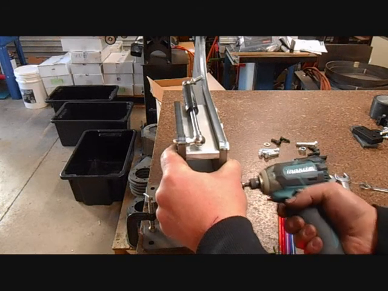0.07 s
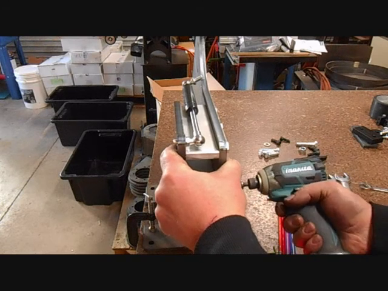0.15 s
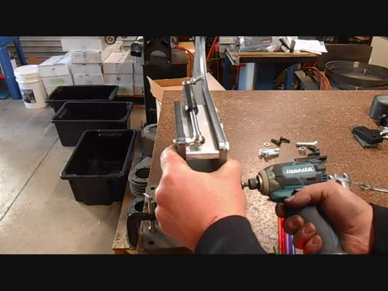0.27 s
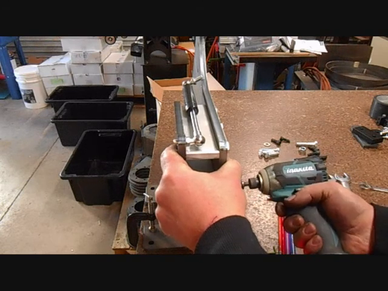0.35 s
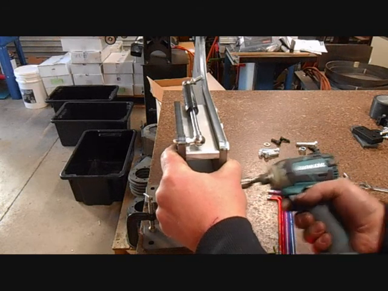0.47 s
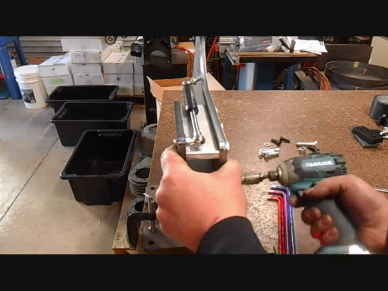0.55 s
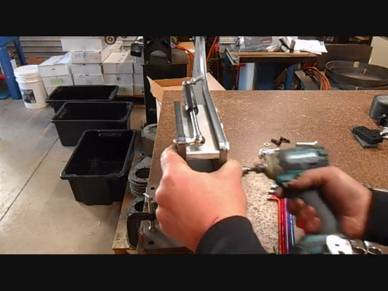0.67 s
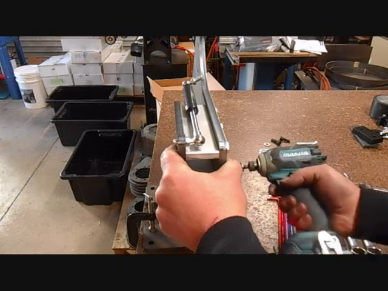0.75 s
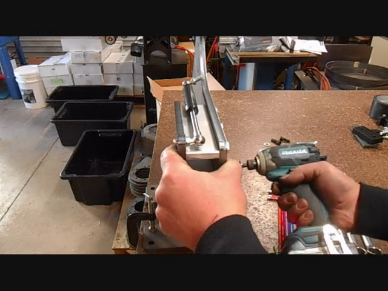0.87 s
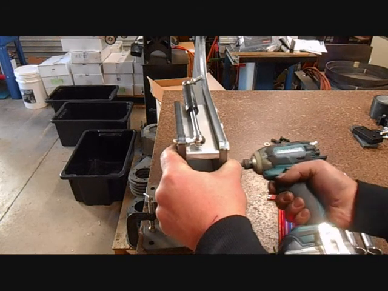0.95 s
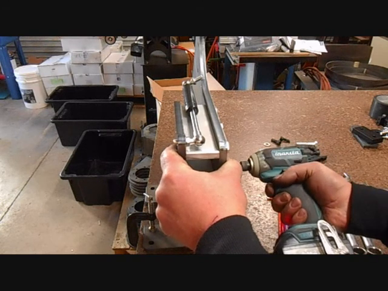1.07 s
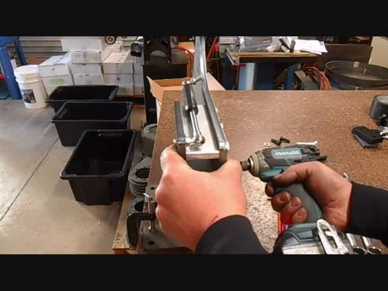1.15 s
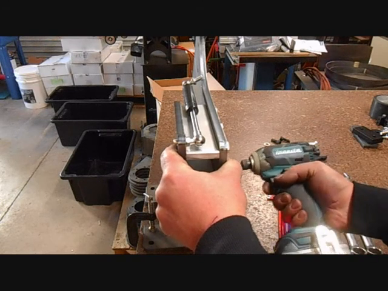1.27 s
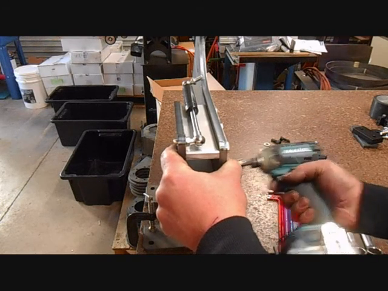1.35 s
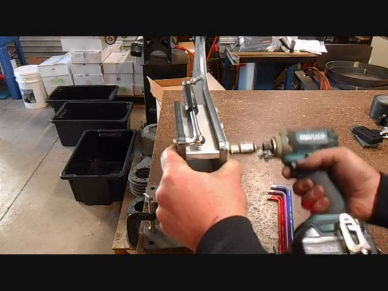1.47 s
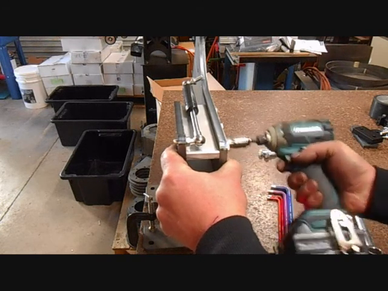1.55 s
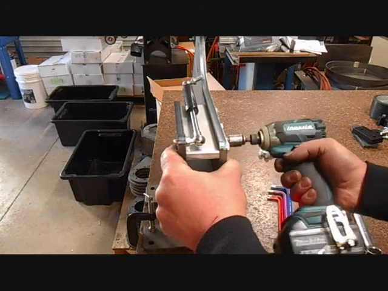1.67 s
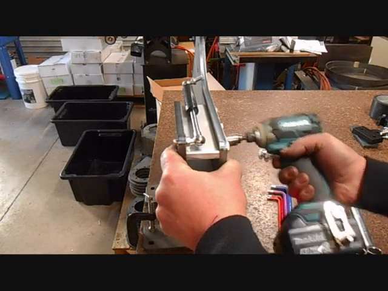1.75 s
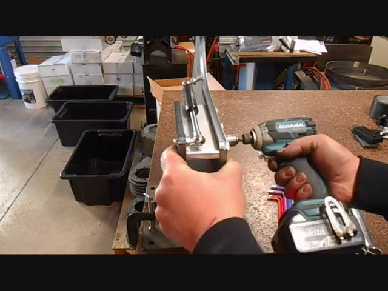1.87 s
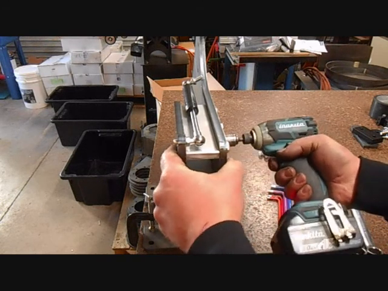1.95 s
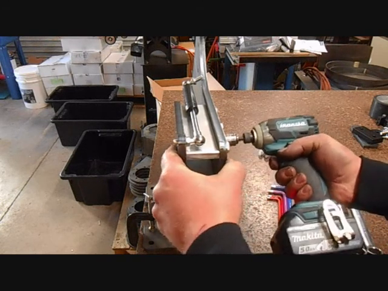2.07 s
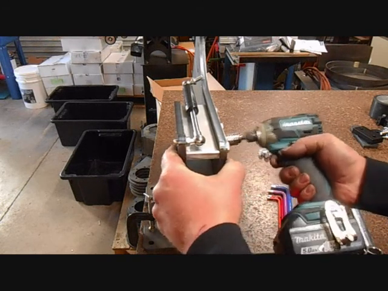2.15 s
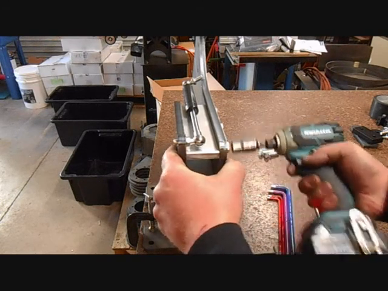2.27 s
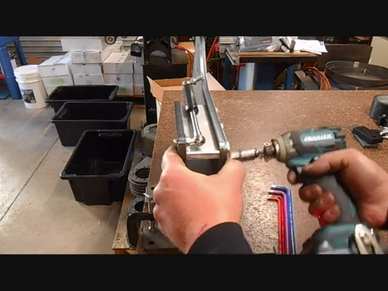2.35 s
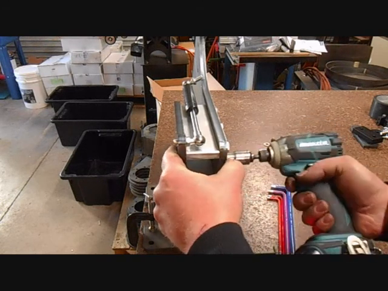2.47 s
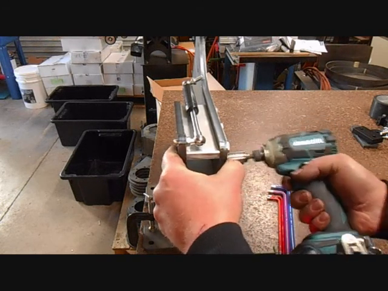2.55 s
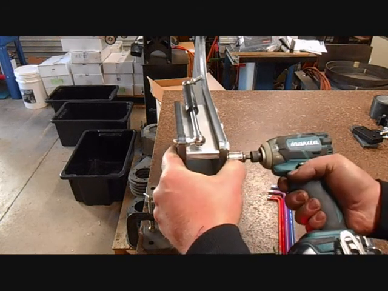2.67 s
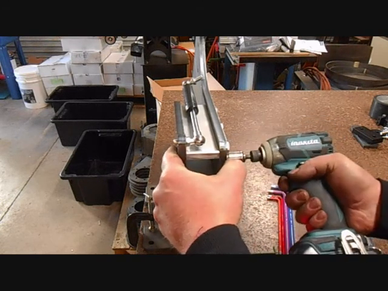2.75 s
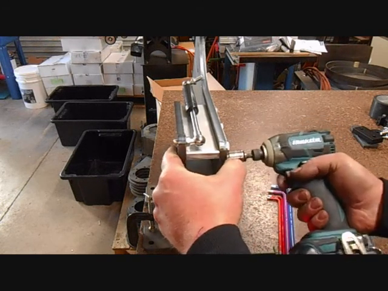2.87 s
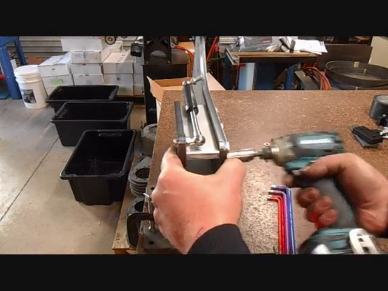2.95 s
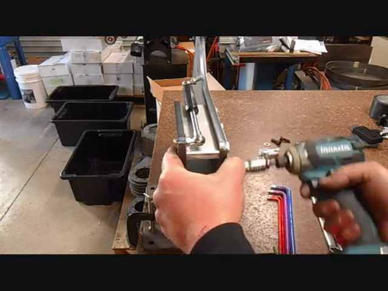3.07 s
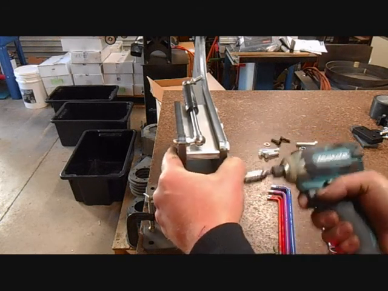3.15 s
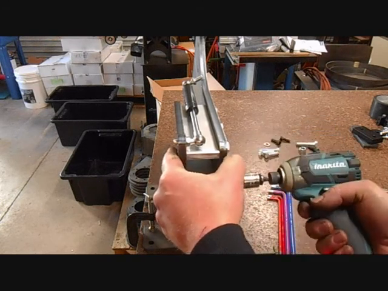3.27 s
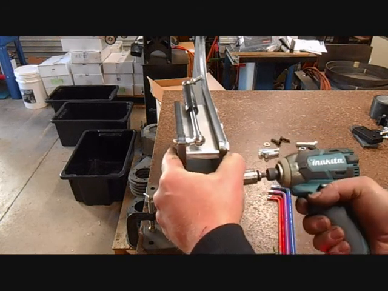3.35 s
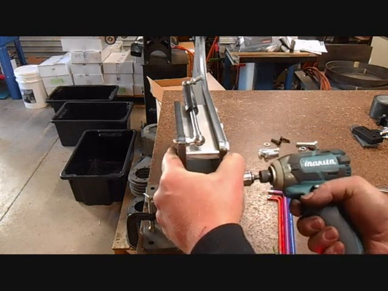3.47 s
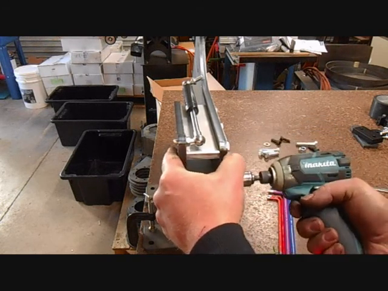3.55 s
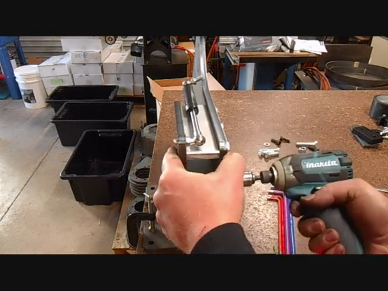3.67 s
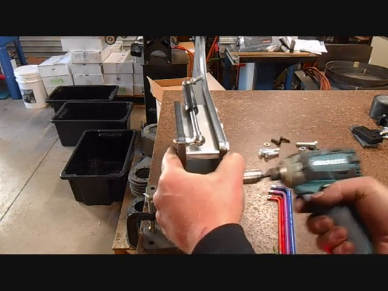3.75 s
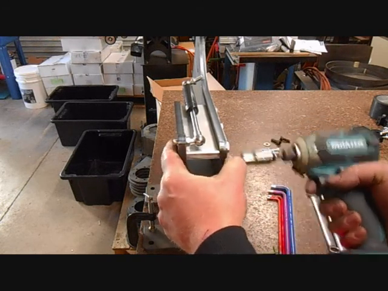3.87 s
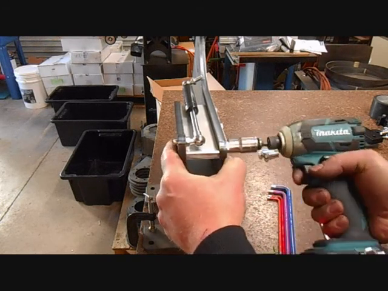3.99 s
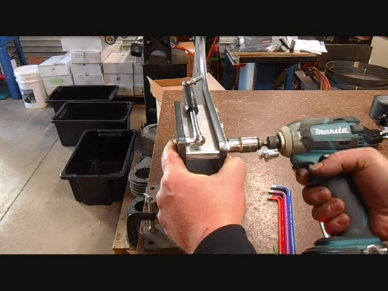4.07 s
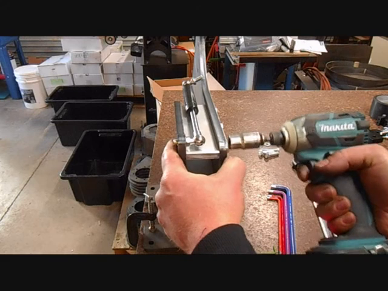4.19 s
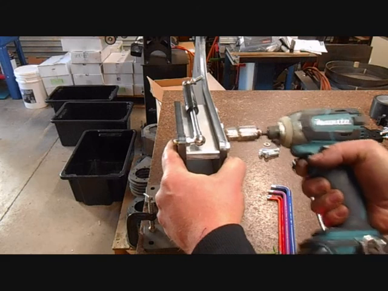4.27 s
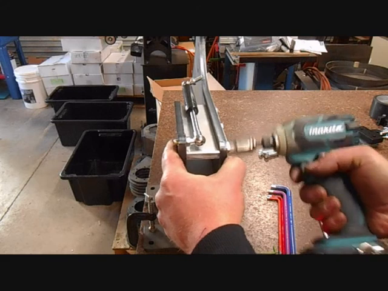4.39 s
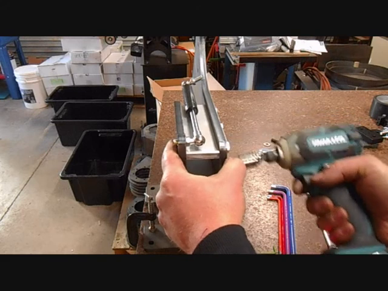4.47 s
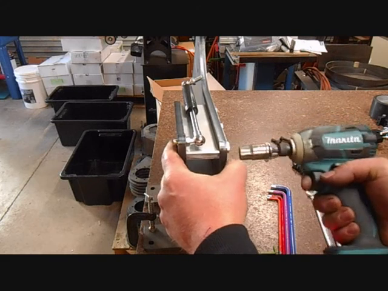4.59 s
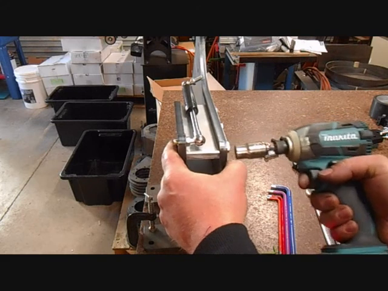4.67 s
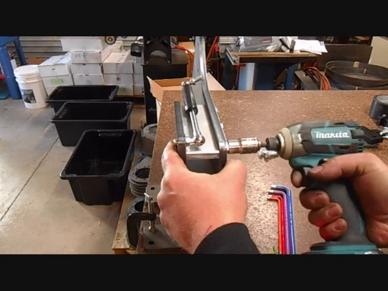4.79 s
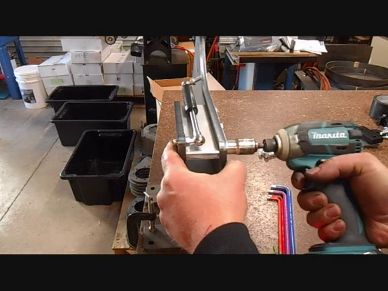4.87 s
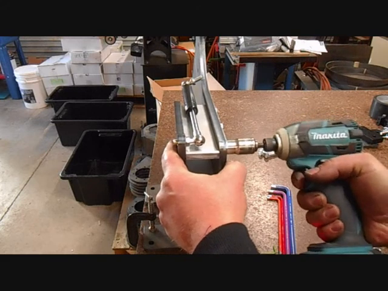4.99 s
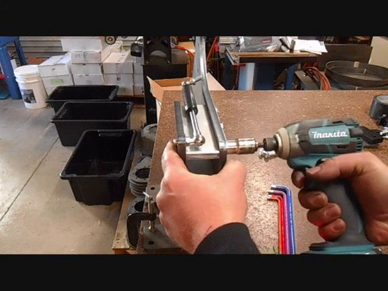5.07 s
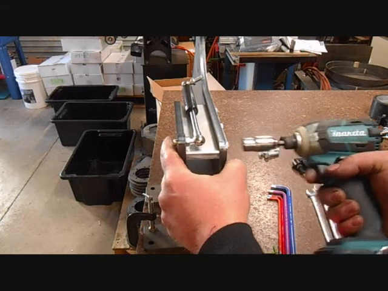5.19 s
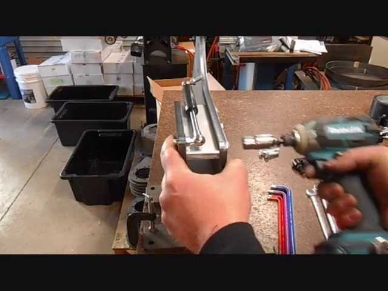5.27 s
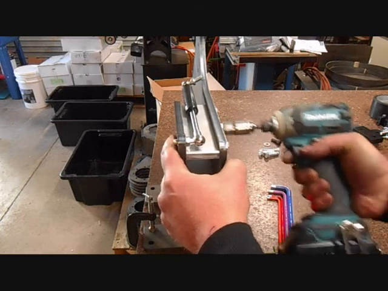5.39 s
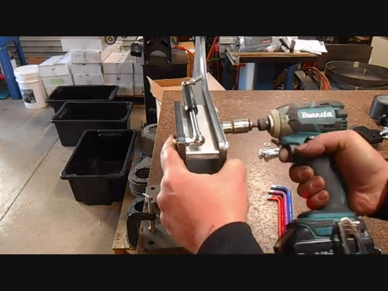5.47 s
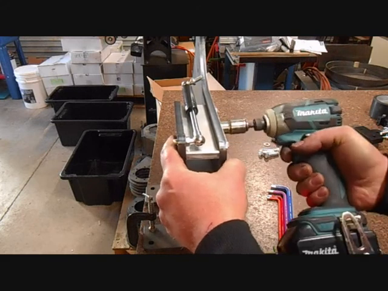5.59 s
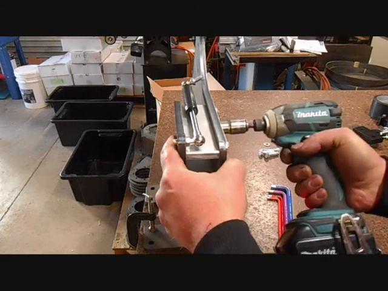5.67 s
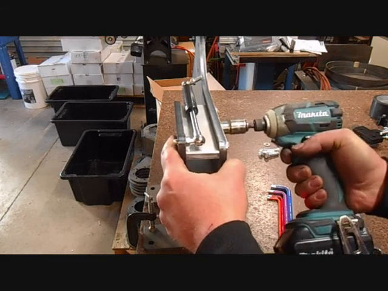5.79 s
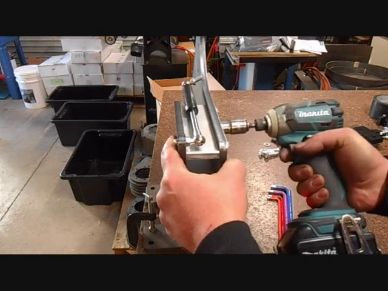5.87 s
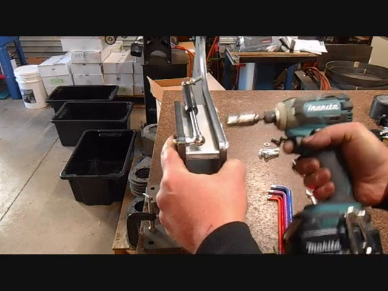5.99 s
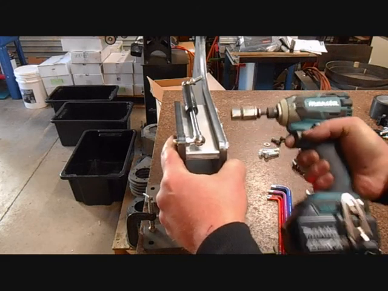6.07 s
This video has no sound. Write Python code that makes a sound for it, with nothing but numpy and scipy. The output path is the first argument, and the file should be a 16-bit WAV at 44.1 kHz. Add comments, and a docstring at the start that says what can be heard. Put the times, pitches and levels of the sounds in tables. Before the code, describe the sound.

Very close, a cordless impact driver works on a steel rail on a workshop bench. Eight times in six seconds the socket clinks onto a bolt, the motor whines up with rasping gears, and on all but the first-rate fast run of the seventh-tenth second or so it breaks into hard, fast metallic hammering, then stops abruptly. One shorter pull only spins. Faint hiss and low rumble fill the gaps, with a short room echo.

```python
"""A cordless impact driver, close to the microphone, pulls eight times at bolts in a rail on a workshop bench.
The motor whistles and spins up, toothed gears rasp, and on seven pulls the hammer strikes some thirty
times a second: bursts of noisy contacts that ring the steel. Ahead of each run the socket clinks onto
the bolt head; it knocks, ticks and squeals, at rest or turning. Rail and bench boom, the room answers
briefly, and the hiss, hum and low rumble of the shop lie behind."""
import sys
import numpy as np
from scipy import signal
from scipy.fft import rfft, irfft
from scipy.io import wavfile
from scipy.ndimage import uniform_filter1d

SR = 44100
rng = np.random.default_rng(int(sys.argv[2]) if len(sys.argv) > 2 else 0)


def generate_wav(signal):
    """Clip the signal to [-1, 1] and save it as 16-bit WAV at the path in sys.argv[1]."""
    frames = np.transpose(np.atleast_2d(signal))
    scaled = np.clip(frames, -1, 1) * 32767
    pcm = np.round(scaled).astype(np.int16)
    wavfile.write(sys.argv[1], SR, pcm)


N = 270333
TIME = np.arange(N) / SR

# Levels in the tables are relative: the gains of each source and of the microphone channel follow.
# trigger pulls: (start [s], soft start [s], release [s], free rotor speed [turns/s],
#                 gear noise while the thread bites [dB], gear noise once it runs freely [dB])
TRIGGER_PULLS = [ (.06, .038, 0.52, 383, -10, -17.5), (.895, .02, 1.385, 343, -14.5, -19.5),
                 (1.74, .018, 2.25, 366, -17, -18), (2.53, .012, 2.97, 395, -22, -25.5),
                 (3.315, 0.029, 3.828, 385, -19.5, -23), (4.15, .022, 4.525, 420, -23, -23.5),
                 (4.9, .02, 5.22, 240, -10.5, -12), (5.615, .088, 5.98, 276, -19, -19), ]
# ringing of rail, bolt and socket: (frequency [Hz], level [dB], t60 [s])
STEEL_RINGING = [(1636, -24, .1), (2023, -23, .12), (2326, -23, .13), (2497, -23, .13), (3554, -21, .04),
                 (4192, -18, .05), (5145, -20, .04), (6713, -21, .05), (6916, -21, .05), (8193, -18, .04),
                 (8446, -19, .04), (9502, -23, .08)]
# resonances of gear case and housing: (frequency [Hz], width [Hz], level [dB])
HOUSING_RESONANCES = [(268, 87, -7), (980, 180, -33), (1950, 45, 9.5), (3330, 660, -1), (4350, 240, -2.5),
                      (4820, 174, -7), (6750, 120, 0), (8300, 34, 11.5)]
# whine of motor and gears: (multiple of the rotor speed), and in the same order (level [dB])
WHINE_ORDERS = [1, 3, 6, 9, 12, 15, 21]
WHINE_LEVELS = [-30, -19, -16, -15, -20, -14.5, -21.5]
# spectrum of the hammer blows: (frequency [Hz], density [dB])
BLOW_SPECTRUM = [(24, -62), (40, -28), (104, -20.5), (174, -18), (277, -12), (358, -17.5), (411, -8),
                 (790, -11.5), (1260, -5), (2650, -2.5), (4540, 1.5), (6000, -2.5), (8320, -1.5),
                 (10500, -3.5), (13600, -75), (22000, -120)]
# spectrum of the socket on the bolt head: (frequency [Hz], density [dB])
CLINK_SPECTRUM = [(59, -77), (100, -24.5), (457, -12.5), (1440, -13), (2250, -4), (2580, -3.5), (4820, 2.5),
                  (5310, 2), (6580, -1), (8640, -2), (10500, -2.5), (13600, -64.5), (22000, -120)]
# spectrum of the gear rasp: (frequency [Hz], density [dB])
GEAR_SPECTRUM = [(35, -56), (60, -14), (155, -21.5), (284, -13.5), (785, -10.5), (1020, -12), (1470, -11.5),
                 (1990, -11.5), (2520, -9), (3000, -3), (3720, -5.5), (4240, 0.5), (8460, -10.5),
                 (10500, -13), (13600, -68), (22000, -120)]
# spectrum of the shop hiss: (frequency [Hz], density [dB])
SHOP_SPECTRUM = [(20, -5), (60, -14), (130, -19), (300, -21), (600, -23), (1450, -27.5), (2500, -20),
                 (4300, -17.5), (7000, -26.5), (10500, -34)]
# reverberation of the shop: (frequency [Hz], t60 [s])
ROOM_DECAY = [(150, 0.24), (1000, 0.25), (4000, 0.21), (10000, 0.17)]
# the socket rubs on the bolt and sings, at rest or turning:
# (start [s], end [s], frequency [Hz], level [dB])
SOCKET_SQUEALS = [(.008, .06, 4200, -29), (0.98, 1.135, 4840, -24), (0.997, 1.221, 1986, -29),
                  (1.879, 2.071, 2052, -30), (2.486, 2.546, 4196, -27), (2.557, 2.815, 4230, -24),
                  (4.256, 4.474, 2330, -34), (4.83, 5.05, 2320, -29), (4.83, 5.05, 1636, -34),
                  (4.837, 5.05, 2472, -23)]
# low boom of rail and bench: (frequency [Hz], width [Hz], level [dB])
BENCH_RESONANCES = [(95.94, 42, 3), (270, 30, -1), (347, 42, -1), (423, 16, -3), (648, 20, -4.5),
                    (1487, 29, -9)]
# how firmly the work presses on the bench: (time [s], level of the boom [dB])
BENCH_PRESSURE = [(0, -10), (1.3, -2), (2.1, -9), (2.85, -3.5), (3.7, 0), (4.4, 7.5), (5.05, 9.5),
                  (5.85, 1.5)]
# hum of the shop: (frequency [Hz], level [dB])
SHOP_HUM = [(215, -62.5), (324, -72), (512, -67.5)]
# hammering as a bolt seats: (first full blow [s], time between blows [s], first blow [dB], loss per blow [dB],
#                             graze ahead of it [s], graze [dB], gear clatter [dB])
HAMMER_RUNS = [ (.394, 0.033, 1, 1.77, 0.016, 3, -5.5), (1.239, 0.035, 3.5, 1.8, .007, -8, -11),
               (2.1037, 0.034, 5.5, 2.5, .018, -4, -6.5), (2.849, 0.037, 2.5, 1.9, 0.0085, -3.5, -12),
               (3.674, .0333, 4, 1.8, .0094, 0, -10), (5.0218, 0.033, 11.5, 3, .015, 4.5, -9),
               (5.8035, 0.033, 4, 2, 0.015, -5.5, -10.5), ]
# the socket is set on a bolt, a tick and then a duller knock as it drops home:
# (time [s], tick [dB], ring [Hz], ring [dB re the contact], drop after [s], drop [dB])
SOCKET_LANDINGS = [ (.009, -32.5, 4220, 5.5, .0212, -17), (0.7973, -6, 6000, -4, .002, -9),
                   (1.6642, -14, 5350, 4, 0.017, -14.5), (2.4753, -14.5, 4060, -1, 0.011, -25),
                   (3.2495, -10.5, 5300, -0.5, 0.015, -18.5), (4.06, -20, 5230, 6.5, .007, -15),
                   (4.822, -1, 4358, -1.5, 0.0019, -6.5), (5.5074, -9.5, 5020, 6, .0085, -14.5), ]
# the socket knocks and jolts on the bolt head, before and during the runs:
# (time [s], level [dB], rattle decay [s], ring [Hz], ring [dB re the contact])
SOCKET_JOLTS = [ (0.167, 3, 0.0065, 5770, -1), (0.2275, -2, .0017, 8130, -1),
                (0.3159, -8, 0.0049, 7670, -9), (.8999, -14, 0.0016, 4470, 8),
                (0.932, -8.5, .004, 3470, -20), (0.957, -3.5, 0.014, 5650, 0),
                (1.0445, -0.5, .0046, 5210, 4.5), (1.737, -26.5, .004, 3600, 4),
                (1.768, -7.5, 0.0011, 4437, 1), (1.7781, -12, 0.0027, 5280, 2),
                (1.8457, 1, 0.0057, 5230, -0.5), (2.542, -19.5, .0017, 4160, 1.5),
                (2.5898, -5.5, 0.0046, 4060, -20), (2.641, -9, 0.0027, 4305, 6.5),
                (3.364, -7, .002, 3330, -1.5), (3.482, -11.5, 0.014, 4300, -5),
                (3.5094, -6.5, .014, 5432, 2.5), (4.1814, -24, 0.0019, 3910, 7.5),
                (4.2198, -12, .004, 9606, -6.5), (4.381, 2.5, 0.006, 5002, -1), (4.334, -14, .002, 9100, 1),
                (4.5307, -19, .001, 8765, 10), (4.857, -9.5, .008, 2440, -2.5),
                (4.878, -12, 0.0094, 2320, 4), (4.934, -12, .003, 5060, -5), (4.9442, 5, 0.016, 5230, -3.5),
                (5.597, -17.5, 0.0039, 7960, -8), (5.632, -4.5, .006, 4500, -0.5),
                (5.72, -10, 0.0039, 4209, 1), ]
# the hands shift their grip and jog the bench: (time [s], length [s], level [dB])
GRIP_SHIFTS = [(1.6, 0.065, -49), (2.659, 0.047, -59), (4.1, .08, -50), (4.304, .08, -55),
               (4.8, 0.069, -45)]
# short extra contacts of hammer and anvil before, between and after the blows: (time [s], level [dB])
EXTRA_CONTACTS = [(.387, -1), (2.249, -8), (3.6568, -9.5), (3.823, -7), (3.839, -19), (5.031, 9.5),
                  (5.181, -8), (5.224, -13), (5.822, -5)]

SHOP_DB, SWITCHING_HZ, CUTOFF_HZ = -49.5, 7890, 10650
# spin-up, coasting and the speed to which hammering drags the rotor
CREEP_TURNS_PER_S, SPIN_UP_S, COAST_S, LOADED_TURNS_PER_S = 20, .043, .028, 195
# gear noise goes from biting to running freely between these times after spin-up begins
BITE_S, FREE_S = 0.11, 0.18
# load builds up around the first blow; the gears' clatter then dies down to a steady level
LOAD_RISE_S, CLATTER_PEAK_S, CLATTER_FADE_DB_PER_S, LOADED_GEAR_DB = .035, .012, 205, -36.5
# the first gap is longer while the rotor slows; each blow rattles for a shorter time than the last
FIRST_GAP_EXTRA_S, BLOW_DECAY_S, BLOW_DECAY_RATIO = .0032, 0.0083, 0.81
EXTRA_CONTACT_DECAY_S = 0.0025
TICK_DECAY_S, TICK_THUD_DB, DROP_DECAY_S, DROP_THUD_DB = 0.0087, -9, 0.0044, 9
JOLT_THUD_DB = -1.5
# play in the socket: average rate while it spins fast, and average level
TICKS_PER_S, TICKS_DB = 14, -14


def from_db(db):
    """Decibels to gain."""
    return np.exp(np.asarray(db) * (np.log(10) / 20))


def rms_one(x):
    """Scale to an rms of 1."""
    return x / np.sqrt(np.mean(x ** 2) + 1e-20)


def at_hz(points, hz):
    """Read a table on a log-frequency axis."""
    f, value = np.transpose(points)
    return np.interp(np.log(np.maximum(hz, 1)), np.log(f), value)


def band(x, edges_hz, kind):
    """Second-order Butterworth filter."""
    sections = signal.butter(2, edges_hz, kind, fs=SR, output="sos")
    return signal.sosfilt(sections, x + 1e-18)


def drift(per_s, size=N):
    """Slow random wander with an rms of 1, joining random points at the given rate."""
    knots = rng.standard_normal(int(size / SR * per_s) + 2)
    return rms_one(np.interp(TIME[:size] * per_s, np.arange(len(knots)), knots))


def coloured(x, spectrum, size=4096):
    """Causal (minimum-phase) filter with the given spectrum; white noise keeps its power."""
    hz = np.arange(size // 2 + 1) * SR / size
    gain = from_db(at_hz(spectrum, hz)) / np.hypot(1, (hz / CUTOFF_HZ) ** 10)
    cepstrum = irfft(np.log(gain))
    # folding the cepstrum forward gives minimum phase
    cepstrum[1:size // 2] *= 2
    cepstrum[size // 2 + 1:] = 0
    response = irfft(np.exp(rfft(cepstrum)))
    return signal.fftconvolve(x, response / np.linalg.norm(response))[:N]


def resonance(x, hz, width_hz):
    """Two-pole resonance with a gain of about 1 at its peak."""
    r = np.exp(-np.pi * width_hz / SR)
    zeros = np.array([1, 0, -1]) * (1 - r * r) / 2
    poles = [1, -2 * r * np.cos(2 * np.pi * hz / SR), r * r]
    return signal.lfilter(zeros, poles, x + 1e-18)


def rattle(t, decay, grain_db, rise=0.00017):
    """Steel chatters on steel: a noise burst of uneven micro-contacts that rises fast and dies."""
    envelope = np.exp(-(t / decay) ** 0.97) * (1 - np.exp(-t / rise))
    grain = from_db(abs(grain_db) * drift(1219, size=len(t)))
    burst = envelope * rng.standard_normal(len(t)) * grain
    return burst * np.linalg.norm(envelope) / np.linalg.norm(burst)


def add(track, s, sound):
    """Mix a sound into a track at time s."""
    start = int(max(s, 0) * SR)
    track[start:start + len(sound)] += sound[:N - start]


def background(tool, rumble_hz=55, rumble_db=-67, shake_db=-39, swell_db=3):
    """Shop hiss and hum, and a low rumble that swells as the tool shakes the hands or they shift grip."""
    shake = np.sqrt(np.abs(uniform_filter1d(tool ** 2, size=2500)))
    grips = sum(from_db(db) * np.exp(-((TIME - s) / length) ** 2) for s, length, db in GRIP_SHIFTS)
    swell = from_db(rumble_db + swell_db * drift(9.6)) + from_db(shake_db) * shake + grips
    rumble = rms_one(band(rng.standard_normal(N), [15, rumble_hz], "band")) * swell
    hum = sum(from_db(db) * np.sin(2 * np.pi * hz * TIME + 0.18 * drift(6.4)) for hz, db in SHOP_HUM)
    hiss = from_db(SHOP_DB) * coloured(rng.standard_normal(N), SHOP_SPECTRUM)
    return hiss + hum + rumble


def squeals(width_hz=65, squeal_db=-3, catch_db=5):
    """The rubbing socket sings: noise of uneven strength in one narrow resonance while contact lasts."""
    out = np.zeros(N)
    for start, end, hz, db in SOCKET_SQUEALS:
        rubbing = uniform_filter1d(1. * ((TIME > start) & (TIME < end)), size=400)
        song = resonance(rng.standard_normal(N), hz, width_hz) * from_db(catch_db * drift(120))
        out += from_db(db) * rubbing * rms_one(song)
    return from_db(squeal_db) * out


def knocks():
    """Landings and jolts of the socket, as rows (s, dB, rattle decay s, thud dB, ring Hz, ring dB)."""
    rows = [(s, db, decay, JOLT_THUD_DB, hz, ring_db) for s, db, decay, hz, ring_db in SOCKET_JOLTS]
    for s, db, hz, ring_db, after, drop_db in SOCKET_LANDINGS:
        rows.append((s, db, TICK_DECAY_S, TICK_THUD_DB, hz, ring_db))
        rows.append((s + after, drop_db, DROP_DECAY_S, DROP_THUD_DB, hz, ring_db))
    return rows


def socket(clink_db=-1, thud_hz=1500, thud_db=4):
    """The socket knocks on the bolt head: a bright rattle with a low thud of its own level."""
    force, t = np.zeros(N), TIME[:SR // 8]
    for s, db, decay, low_db, _, _ in knocks():
        knock = from_db(db) * rattle(t, decay, grain_db=3.0)
        bright = band(knock, thud_hz, "high")
        thud = from_db(low_db + thud_db) * band(knock, thud_hz, "low")
        # opposite sign: the two filters would cancel where they cross
        add(force, s, bright - thud)
    return from_db(clink_db) * coloured(force, CLINK_SPECTRUM)


def pings(ping_db=1, roughness=1.0, rise=0.0002):
    """At each knock the socket rings at a pitch set by how it sits, jostled and damped by the contact."""
    out, t = np.zeros(N), TIME[:SR // 8]
    for s, db, decay, _, hz, ring_db in knocks():
        tone = np.sin(2 * np.pi * hz * t + roughness * drift(900, size=len(t)))
        envelope = np.exp(-t / decay) * (1 - np.exp(-t / rise))
        add(out, s, from_db(db + ring_db) * tone * envelope)
    return from_db(ping_db) * out


def steel(x):
    """Contacts pass straight out and also ring the steel modes, whose strengths wander over time."""
    out = x.copy()
    for k, (hz, db, t60) in enumerate(STEEL_RINGING):
        width = np.log(1000) / (np.pi * t60)
        struck = x * from_db(db + 3 * drift(30))
        # narrow modes are raised to make up for the little noise power they let through
        makeup = np.sqrt(CUTOFF_HZ / (np.pi * width))
        out += makeup * resonance(struck, hz, width) * (-1) ** k
    return out


def bench(x):
    """Vibration travels through the rail into the bench top, which booms."""
    boom = sum(from_db(db) * resonance(x, hz, width) for hz, width, db in BENCH_RESONANCES)
    return boom * from_db(np.interp(TIME, *np.transpose(BENCH_PRESSURE)))


def room(x, wet_db=-10, first_echo=0.011, build_up=0.003):
    """Echoes from bench, shelves and walls merge into a noise tail that dies at its own rate per octave."""
    t, tail = TIME[:SR], 0
    edges = np.geomspace(50, 12800, num=9)
    for low, high in zip(edges, edges[1:]):
        t60 = at_hz(ROOM_DECAY, np.sqrt(low * high))
        tail = tail + band(rng.standard_normal(SR), [low, high], "band") * from_db(-60 * t / t60)
    tail = tail * np.clip((t - first_echo) / build_up, 0, 1)
    return from_db(wet_db) * signal.fftconvolve(x, tail / np.linalg.norm(tail))[:N]


def drive():
    """Rotor speed, gear level, load and trigger kick: creep, spin-up, drag by the hammer, coasting."""
    speed, level, load, trigger = np.zeros((4, N))
    for start, soft, release, free, bite_db, run_db in TRIGGER_PULLS:
        on = (TIME > start) & (TIME < release + 4 * COAST_S)
        age = np.maximum(TIME - start - soft, 0)
        coast = np.exp(-np.maximum(TIME - release, 0) / COAST_S)
        turns = free + (CREEP_TURNS_PER_S - free) * np.exp(-age / SPIN_UP_S)
        gears = turns / free * from_db(np.interp(age, [BITE_S, FREE_S], [bite_db, run_db]))
        for first, *_, clatter_db in HAMMER_RUNS:
            if start < first < release:
                since = TIME - first - CLATTER_PEAK_S
                seated = np.clip(1 + since / (LOAD_RISE_S + CLATTER_PEAK_S), 0, 1)
                fading_db = clatter_db - CLATTER_FADE_DB_PER_S * np.maximum(since, 0)
                clatter = from_db(fading_db) + from_db(LOADED_GEAR_DB)
                turns = turns + seated * (LOADED_TURNS_PER_S - turns)
                gears = gears + seated ** 2 * (clatter - gears)
                load += on * seated
        speed += on * coast * turns
        level += on * coast ** 2 * gears
        trigger += on * np.exp(-np.maximum(TIME - start, 0) / .1)
    level, trigger = uniform_filter1d([level, trigger], size=200)
    return speed, level, np.clip(load, 0, 1), trigger


def whistle(angle, trigger, running, start_db=-39, run_db=-24, lower_db=-7, waver_db=2):
    """The speed control whistles at start-up and in the run, with sidebands at twice the rotor speed."""
    switching = 2 * np.pi * SWITCHING_HZ * TIME
    upper = np.sin(switching + 2 * angle)
    lower = from_db(lower_db) * np.sin(switching - 2 * angle)
    loudness = from_db(start_db) * trigger + from_db(run_db) * running
    return (np.sin(switching) + upper + lower) * loudness * from_db(waver_db * drift(37))


def tooth_flaws(angle, count=30, size=1024):
    """Gear-tooth flaws come round at every turn: a comb of lines that glides with the speed."""
    phases, turn = rng.uniform(0, 2 * np.pi, count), np.linspace(0, 2 * np.pi, size)
    # the two lowest lines are left out
    flaws = rms_one(sum(np.sin((k + 1) * turn + phase) for k, phase in enumerate(phases) if k > 1))
    return np.interp(angle % (2 * np.pi), turn, flaws)


def motor(speed, level, strain, trigger, flutter=.004, mesh_depth=0.4, wobble_db=1.05, flaws_db=-9,
          whine_db=-2, waver_db=4.0, gear_db=-1, strain_db=-3):
    """Gear teeth rasp in the housing and the rotor whines; under load the gears run quieter."""
    # the rotor turns less evenly while it winds up the hammer spring
    unevenness = flutter * (1 + 10 * strain) * drift(150)
    angle = 2 * np.pi * np.cumsum(speed * (1 + unevenness)) / SR
    # teeth meet three times a turn; the socket wobbles at the geared-down speed
    mesh = np.cos(3 * angle) + np.cos(angle) / 2
    spindle = np.sin(angle / 9)
    wobble = from_db(wobble_db * (spindle + drift(300)))
    teeth = rms_one(rng.standard_normal(N) * np.exp(mesh_depth * mesh) * wobble)
    flaws = from_db(flaws_db) * tooth_flaws(angle) * (speed > 0)
    rasp = coloured(teeth + flaws, GEAR_SPECTRUM)
    rasp = rasp + sum(from_db(db) * resonance(rasp, hz, width) for hz, width, db in HOUSING_RESONANCES)
    rasp = rasp / np.std(rasp[speed > 0])
    whine = 0
    for order, db in zip(WHINE_ORDERS, WHINE_LEVELS):
        whine = whine + from_db(db + waver_db * drift(60)) * np.sin(order * angle + .5 * drift(200))
    gears = level * from_db(strain_db * strain) * (from_db(gear_db) * rasp + from_db(whine_db) * whine)
    return gears + whistle(angle, trigger, level * (1 - strain))


def play(speed, decay=.0018, spread_db=3, low_hz=7000):
    """The loose socket ticks brightly at random while it spins faster than under the hammer."""
    force, t = np.zeros(N), TIME[:SR // 50]
    tries = 200
    likelihood = TICKS_PER_S * N / SR / tries
    for place, chance, strength in zip(rng.random(tries), rng.random(tries), rng.standard_normal(tries)):
        tick = rattle(t, decay, grain_db=3.0)
        if speed[int(place * N)] > LOADED_TURNS_PER_S and chance < likelihood:
            add(force, place * N / SR, from_db(TICKS_DB + spread_db * strength) * tick)
    return coloured(band(force, low_hz, "high"), CLINK_SPECTRUM)


def blows(bounce_db=-16, spread_db=0.9, graze_decay=0.0034, bounce_decay=0.0022):
    """Extra contacts, grazes, up to eight fading blows, bounces: (s, dB, decay s, s since first blow)."""
    rows = [(s, db, EXTRA_CONTACT_DECAY_S, 0) for s, db in EXTRA_CONTACTS]
    for first, period, first_db, loss_db, lead, graze_db, _ in HAMMER_RUNS:
        release = min(pull[2] for pull in TRIGGER_PULLS if pull[2] > first)
        rows.append((first - lead, graze_db, graze_decay, 0))
        for k, (strength, bounce, lag) in enumerate(rng.standard_normal((8, 3))):
            since = k * period + FIRST_GAP_EXTRA_S * (k > 0)
            # no blow of the run begins after the trigger is let go
            if first + since < release:
                db = first_db - k * loss_db + spread_db * strength
                rows.append((first + since, db, BLOW_DECAY_S * BLOW_DECAY_RATIO ** k, since))
                bounce_s = first + since + period * (.4 + .12 * lag)
                rows.append((bounce_s, db + bounce_db + 2 * bounce, bounce_decay, since))
    return rows


def hammer(blow_db=-.5, grain_db=3.0, rebound_db=-13, rebound_decay=0.0052, hard_hz=7000,
           hard_after=0.13, hard_gain=0.9, tint_db=2, tint_width_hz=700):
    """Blows crack with a ring of their own and loose parts chatter; a tightening bolt cracks brighter."""
    force, t = np.zeros(N), TIME[:SR // 10]
    for s, db, decay, since in blows():
        blow = rattle(t, decay, grain_db) + from_db(rebound_db) * rattle(t, rebound_decay, grain_db=8)
        tint_hz = rng.uniform(1200, 5550)
        tint = from_db(tint_db) * resonance(rattle(t, decay, grain_db), tint_hz, tint_width_hz)
        hardness = hard_gain * min(since / hard_after, 1)
        crack = hardness * band(rattle(t, decay, grain_db), hard_hz, "high")
        add(force, s, from_db(db) * (blow + tint + crack))
    return from_db(blow_db) * coloured(force, BLOW_SPECTRUM)


def scene():
    """Driver and rail close by, the shop around them; the pings are sent more weakly into the room."""
    speed, level, load, trigger = drive()
    contacts = hammer() + socket() + play(speed)
    tool = motor(speed, level, load, trigger) + steel(contacts) + squeals()
    tool = tool + bench(tool)
    ping = pings()
    echoes = room(tool + .3 * ping)
    return (tool + ping + echoes + background(tool))[None]


def gain_control(x, threshold_db=-15, share=0.37, release_db_per_s=14):
    """Loud passages turn the gain down; it creeps back up in the pauses."""
    power = uniform_filter1d(x[0] ** 2, size=400)
    level_db = 10 * np.log10(np.maximum(power, 1e-12))
    over_db = np.maximum(level_db - threshold_db, 0) * share
    recovery_db = release_db_per_s * TIME
    held_db = np.maximum.accumulate(over_db + recovery_db) - recovery_db
    return x * from_db(-band(held_db, 32, "low"))


def record(dry, input_db=2, ceiling=0.84):
    """Microphone channel: gain control, soft overload of the peaks, and a steep cut of the top."""
    x = gain_control(from_db(input_db) * dry)
    clipped = x / (1 + (x / ceiling) ** 4) ** (1 / 4)
    top_cut = signal.ellip(10, .1, 70, CUTOFF_HZ, fs=SR, output="sos")
    return signal.sosfilt(top_cut, clipped)


dry = scene()
out = record(dry)
generate_wav(out)
```